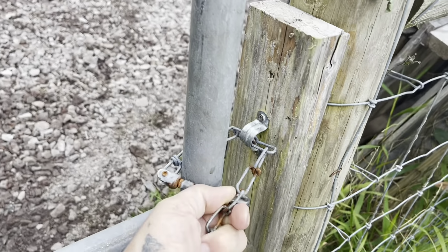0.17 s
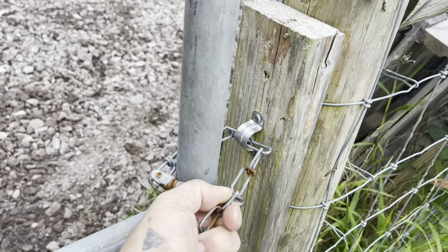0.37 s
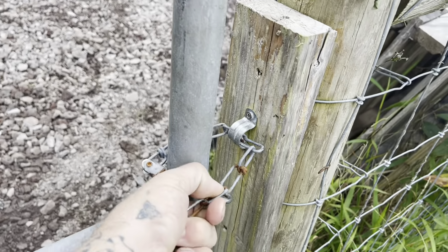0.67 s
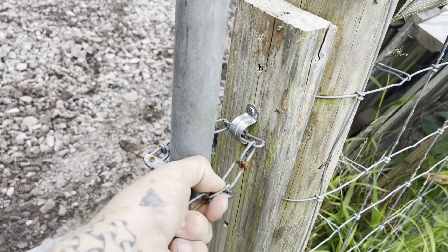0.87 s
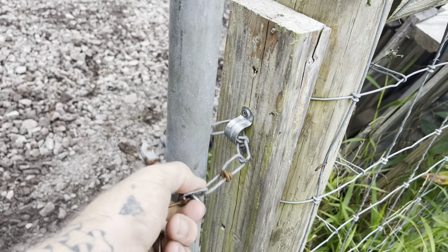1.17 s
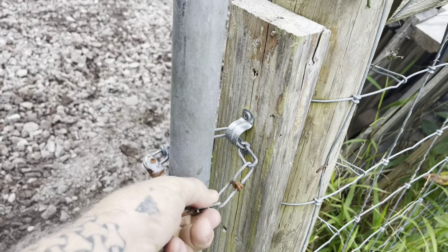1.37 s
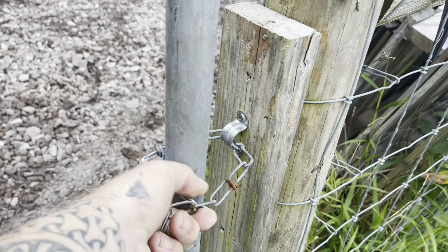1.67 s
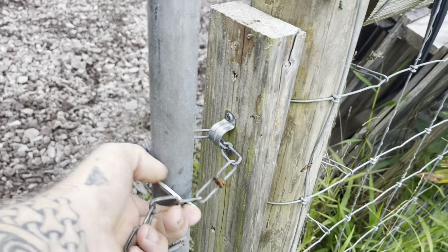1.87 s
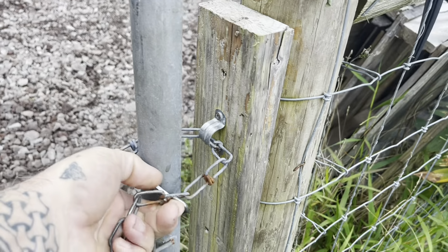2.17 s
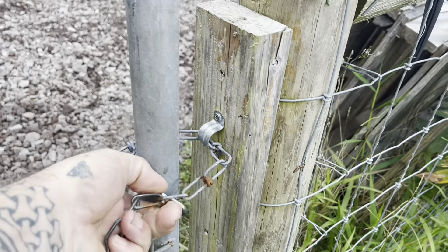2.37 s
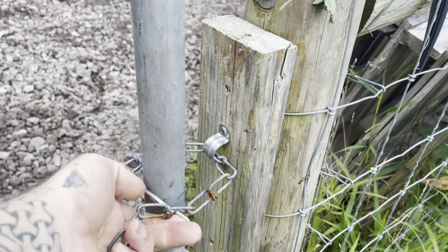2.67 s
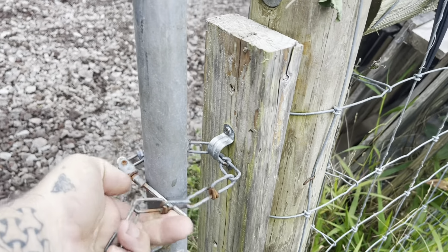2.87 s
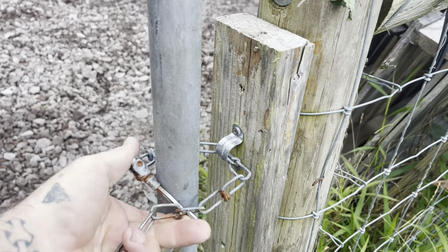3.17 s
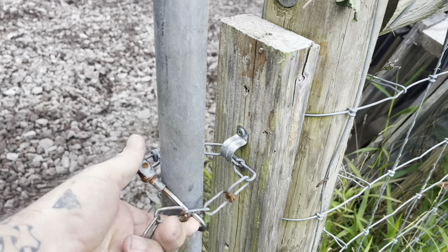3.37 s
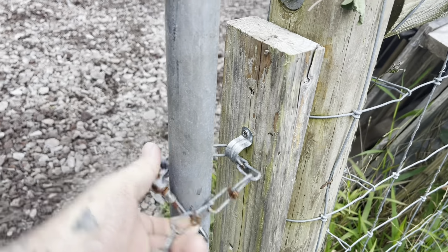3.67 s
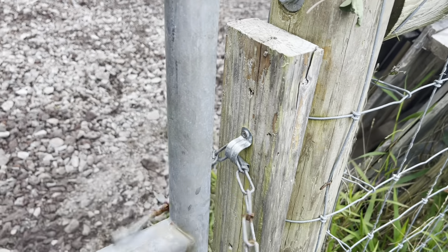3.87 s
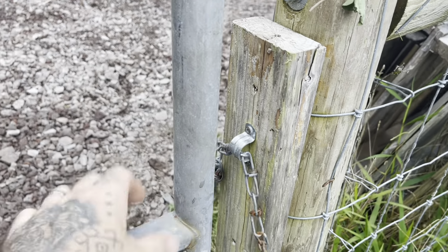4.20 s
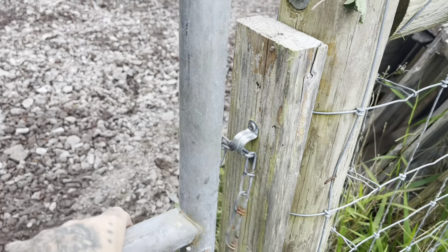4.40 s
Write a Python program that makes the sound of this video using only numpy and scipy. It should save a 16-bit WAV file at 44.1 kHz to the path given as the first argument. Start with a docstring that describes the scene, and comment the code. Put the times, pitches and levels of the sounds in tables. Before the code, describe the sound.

Chain links rub, snatch and ping as a hook is worked loose outdoors; woody knocks and a bright steel clang finish it.

```python
"""A steel-pipe farm gate outdoors, close to a two-port microphone: a hand works a snap hook and chain loose.
Links rub and clink from the start, each contact rings the gate frame, and a small bird calls far off in quiet air.
The hook's catch snaps, the freed chain knocks on the wooden post, and the hook clangs against the pipe.
Steel and wood are short noise bursts and decaying sines that excite random modes; sliding is a stream of tiny
ticks and pings, the bird a falling sine, and the air coloured noise."""
import sys
import numpy as np
from scipy import signal
from scipy.fft import rfft, irfft, next_fast_len
from scipy.io import wavfile
from scipy.ndimage import uniform_filter1d

SR = 44100
rng = np.random.default_rng(int(sys.argv[2]) if len(sys.argv) > 2 else 0)


def store_wav(level_fs):
    """Save 16-bit WAV to argv[1]."""
    pcm = np.round(np.clip(np.atleast_2d(level_fs), -1, 1) * 32767)
    wavfile.write(sys.argv[1], SR, pcm.T.astype(np.int16))


N = 200194

# steel on steel: (time [s], strength [dB], hardness [dB gained per register upwards],
# drive into the gate frame [dB], note of the thud [Hz], note of the clank [Hz])
STEEL_CONTACTS = [(0.006, -64, -2, 7.5, 310, 5590), (0.024, -62.5, -4, 5, 300, 2630),
                  (0.052, -67, -4, 3.5, 563, 1030), (0.071, -60.5, -3.5, 2, 460, 2640),
                  (0.083, -85, -3, 2, 240, 2700), (0.268, -62.5, -1, -5, 580, 2660),
                  (0.503, -63, 1, 7.5, 580, 1480), (0.528, -64, 5, 2.5, 560, 1250),
                  (0.583, -58.5, 0, 0.5, 580, 2180), (0.629, -60, -4.5, -5, 610, 2520),
                  (0.662, -58.5, 1, -0.5, 630, 3590), (0.703, -67.5, 2.5, -12, 270, 980),
                  (0.849, -56.5, -2, -1.5, 550, 6060), (0.895, -69, 2, -5, 500, 3000),
                  (0.922, -53.5, 1, 3, 560, 2540), (0.932, -47.5, -3.5, 4.5, 560, 2380),
                  (0.943, -43, 4.5, -1.5, 290, 1080), (0.951, -41, -1.5, -7.5, 520, 1080),
                  (1.013, -57, -10, -4, 298, 1990), (1.026, -53.5, -8, 3.5, 620, 3490),
                  (1.035, -44, -0.5, -7, 560, 3200), (1.04, -38.5, -2, -9.5, 565, 2970),
                  (1.083, -52.5, -5.5, -2, 520, 970), (1.106, -63, 7.5, 0.5, 270, 960),
                  (1.142, -43.5, 3.5, 6.5, 330, 1810), (1.151, -31.5, 3.5, -1.5, 580, 1845),
                  (1.171, -33, 5, -4.5, 544, 1650), (1.259, -38, 1, 3, 580, 4000),
                  (1.269, -33, 3.5, -18, 363, 4040), (1.325, -38.5, 3.5, -9.5, 565, 2300),
                  (1.352, -46.5, -1.5, -3, 460, 1520), (1.546, -55.5, -3.5, -2, 447, 1250),
                  (1.622, -65, -10, -7, 430, 1100), (1.705, -75, -5, -3, 250, 1460),
                  (1.864, -40, 0, -1.5, 529, 4950), (1.873, -44.5, 0, -3.5, 515, 2125),
                  (2.021, -60, 6, -1, 554, 1580), (2.06, -70, 9, -3.5, 450, 4000),
                  (2.107, -55.5, -6, -1.5, 460, 1010), (2.472, -56, -7.5, -2.5, 540, 1220),
                  (2.534, -64, 6.5, -1, 292, 2110), (2.707, -40.5, 2.5, 0, 580, 1320),
                  (2.792, -39, 2, -7, 294, 3190), (3.343, -53, 1, -3, 560, 6030),
                  (3.374, -67.5, -9, 18.5, 570, 1150), (3.405, -33.5, 5.5, 3.5, 554, 2220),
                  (3.415, -31, -1, -5.5, 564, 2240), (3.427, -31.5, 5, 1.5, 342, 1560),
                  (3.488, -54, 11, -12, 560, 2280), (3.624, -41.5, 6.5, -2.5, 560, 1560),
                  (3.708, -49, 3, -6.5, 500, 4770), (3.724, -52, 5, -5, 500, 4070),
                  (3.736, -39.5, 6.5, 6.5, 527, 2070), (3.745, -43.5, 7, 3, 550, 2000),
                  (3.769, -40, 3, -8, 500, 5270), (3.777, -39.5, 4.5, -0.5, 560, 5590),
                  (3.794, -36, 5.5, 4, 560, 5900), (3.815, -39, -4.5, -4.5, 320, 2080),
                  (3.823, -47.5, -13, -1, 310, 2200), (3.88, -39, 5, 8.5, 620, 1080),
                  (3.958, -48, 0.5, 7.5, 320, 4680), (4.005, -50, 5.5, -8, 270, 1670),
                  (4.031, -53, 4, -9, 270, 4650), (4.082, -45.5, 6, -13, 565, 1250),
                  (4.151, -39, 8, -11, 530, 3130), (4.178, -59, 12, -16, 580, 1940),
                  (4.246, -52, -4.5, 3.5, 560, 2600), (4.311, -27.5, 4, 7.5, 620, 4020),
                  (4.314, -30, 0.5, -14, 600, 3850), (4.346, -35.5, 6.5, 6, 630, 1520),
                  (4.46, -37, 0, 0.5, 555, 1790), (4.527, -42, 7.5, 12.5, 580, 1670)]
# thud, clank, clink and tick registers: (low edge [Hz], high edge [Hz])
CONTACT_REGISTERS = [(120, 750), (750, 2700), (2700, 6500), (6500, 13000)]
# how each register dies: (contact t60 [s], chain shiver [dB], frame ring [dB])
REGISTER_DECAYS = [(0.075, -4.5, 2), (0.031, 1, 1.5), (0.019, -6, -1.5), (0.0098, -4, -5.5)]
# colour of a contact within its registers: (frequency [Hz], level [dB])
STEEL_COLOUR = [(120, -4), (190, -12), (290, 2), (400, -5), (570, -0.5), (800, -3.5), (1200, 1.5),
                (3100, -0.5), (4000, 0), (5500, 2), (7000, -2), (8200, 7), (9500, 9.5), (13000, 0.5)]
# hook and links: (frequency [Hz], level [dB], t60 [s])
HOOK_MODES = [(3750, -29.5, 0.18), (4167, -29, .3), (4400, -29.5, 0.35), (5260, -17, 0.45),
              (5160, -27.5, .35), (6320, -6.5, 0.41), (7430, -22, .4), (8100, -19.5, 0.28),
              (8700, -22, 0.3), (7800, -18, 0.22), (8300, -16, 0.18), (8500, -31, .2), (8530, -27, 0.16),
              (9400, -22.5, 0.26)]
# the hook's bow while it is latched: (frequency [Hz], level [dB], t60 [s])
HELD_BOW_MODES = [(4000, -22.5, 0.87), (7940, -11.5, 0.13), (7840, -12, 0.26), (11100, -12.5, 0.11)]
# the hook's bow once it hangs free: (frequency [Hz], level [dB], t60 [s])
FREE_BOW_MODES = [(3822, -24, .4), (4005, -25, .3), (4237, -24, 0.6), (4689, -16, 0.35), (4737, -22, .25),
                  (4915, -24, .5), (5370, -24, .36), (6266, -24, 0.45), (6907, -22, 0.5), (7079, -22, 0.35),
                  (7820, -22, 0.35), (8457, -20, 0.22), (8720, -21, .25), (11400, -22, .12)]
# strongest modes of the gate pipe: (frequency [Hz], level [dB], t60 [s])
PIPE_MODES = [(541, -13.5, 0.75), (580, -17, 1.5), (650, -15, 0.62), (815, -17, 1.3), (917, -16, 1.9),
              (1003, -7.5, 2.1), (1080, -8, 3.9), (1089, -9, 2), (1240, -17.5, 1.4), (1488, -10.5, 3),
              (1538, -14.5, 1.8), (1660, -15.5, 3.1), (1700, -14, 1.6), (2035, -16, 1.5), (2115, -12, 2.1),
              (2260, -10.5, 1.7), (2420, -16.5, 1.4), (3060, -16, 0.72), (3680, -16, 2), (4021, -21.5, 1.1)]
# colour of a crowd of weaker modes: (frequency [Hz], level [dB])
CROWD_COLOUR = [(120, 6), (200, -11.5), (300, -5.5), (400, -7), (560, -1), (820, -2), (1100, 1), (1500, -1),
                (1850, -1), (2250, 1.5), (2700, -3), (3300, -7.5), (3800, 2), (4800, -0.5), (5400, -2),
                (8100, 3), (12500, -4)]
# how the frame's weaker modes die: (frequency [Hz], t60 [s])
FRAME_DECAY = [(150, 3.5), (500, 1.17), (1200, 2.43), (2400, 1.17), (4000, 1.02), (8500, 0.49),
               (12000, 0.36)]
# two links snatch tight with a very short, bright crack: (time [s], level [dB], frequency [Hz])
LINK_CRACKS = [(1.1516, -28, 7900), (1.2694, -31, 8000), (2.7073, -29, 8370), (3.403, -30, 5950),
               (3.406, -26, 8600), (3.4265, -21.5, 8300), (3.431, -30, 8100), (3.794, -25, 6800),
               (3.8808, -32, 11500), (4.346, -25.5, 9000), (4.527, -27.5, 8600)]
# notes of the hook's sprung catch: (frequency [Hz], level [dB], t60 [s])
CATCH_MODES = [(3000, 0.5, 0.067), (3150, 3, 0.041), (3600, 1, 0.092), (3671, -9, 1.4), (3570, -9.5, 0.84),
               (4430, -22, .8)]
# a link lands on the post: (time [s], level [dB], favoured note [Hz], crunch t60 [s], crunch [dB])
POST_KNOCKS = [(0.004, -51, 396, 0.035, -5), (0.031, -57, 300, .03, -13), (1.546, -40.5, 1150, 0.034, -4),
               (1.55, -39.5, 386, 0.051, -8.5), (2.798, -44.5, 380, 0.04, -5),
               (4.08, -25.5, 2080, 0.017, 6), (4.084, -32.5, 1110, 0.033, 3),
               (4.0877, -22, 1260, 0.0081, -5.5), (4.095, -29.5, 560, 0.037, -4),
               (4.117, -39.5, 2670, 0.015, -2), (4.121, -35, 450, 0.021, -5),
               (4.1479, -22.5, 3000, 0.017, -14), (4.149, -19, 2650, 0.019, -3),
               (4.151, -32.5, 600, 0.017, -1), (4.156, -33, 1390, 0.036, 12), (4.181, -48, 1900, 0.034, 10)]
# the wooden post with its staple: (frequency [Hz], level [dB], t60 [s])
POST_MODES = [(337, -3.5, 0.08), (460, -4, 0.1), (580, -0.5, 0.086), (786, -18, 0.044), (1243, 5.5, 0.053),
              (1564, 2.5, 0.04), (1900, -8, 0.047), (2290, 0, 0.028), (2994, 5.5, 0.016), (3500, -5, 0.017),
              (6300, -0.5, 0.0058), (9000, 12, 0.001)]
# the hook's shank, ahead of its band-pass: (frequency [Hz], level [dB], t60 [s])
SHANK_MODES = [(3780, -3.5, 0.071), (3810, -2.5, 0.02), (4340, -14, 0.041), (4800, -8, 0.087)]
# moves of the hand: (start [s], hold [s], links sliding [dB], gate stirring [dB])
HAND_MOVES = [(0.0, 0.031, -57, -53), (0.15, 0.033, -78, -65), (0.28, 0.094, -74.5, -75.5),
              (0.492, 0.14, -64.5, -62), (0.875, 0.05, -63.5, -68), (0.995, 0.19, -67, -49),
              (1.304, 0.03, -61, -45), (1.61, 0.044, -66.5, -58), (1.667, 0.15, -70.5, -69),
              (2.039, 0.125, -61, -61.5), (2.525, 0.42, -63.5, -60), (2.808, 0.14, -59.5, -54.5),
              (3.213, 0.08, -68.5, -76.5), (3.4, 0.31, -61, -50), (3.607, 0.11, -60, -47),
              (3.742, 0.063, -37, -46), (3.807, 0.04, -43.5, -46), (3.979, 0.06, -54, -44),
              (4.136, 0.04, -49.5, -41), (4.41, 0.11, -37.5, -51.5)]
# falling whistles of the bird: (time [s], peak level of the direct sound [dB])
BIRD_NOTES = [(0.126, -69), (.274, -67), (0.424, -68.5)]
# colour of the outdoor rush: (frequency [Hz], relative level [dB per Hz])
AIR_COLOUR = [(20, -35.5), (40, -16.5), (60, 1.5), (110, -4), (170, -0.5), (300, -8.5), (600, -10.5),
              (1200, -17), (2200, -23.5), (3200, -24.5), (5300, -20.5), (7000, -35), (11000, -37),
              (14000, -61)]
# the two microphone ports: (frequency [Hz], left minus right [dB])
PORT_LEVELS = [(100, 3), (330, -1.5), (650, 5.5), (1200, 3), (4400, 2.5), (8000, 1.4), (13000, -1)]
# the two microphone ports: (frequency [Hz], lead of the left [radians])
PORT_LEADS = [(300, 0.22), (900, 1), (1200, 0.8), (1700, -1.0), (2000, 0.4), (2500, 0.81), (3300, 1.28),
              (4000, 0.6), (4700, 0.6), (6500, 0.83), (7500, 1.02), (8400, 0.07), (9000, -1.57),
              (10200, -2.5), (11500, -5.4), (13000, -8.5)]

TIME = np.arange(N) / SR
RING = 2 * SR   # samples in the longest ring
AGE = np.arange(RING) / SR   # seconds since a blow

# a taut chain tugs the gate with a thud; once the hook is free the chain hangs slack and thuds less
HOOK_FREE_S = 3.42
TAUT_THUD_DB, SLACK_THUD_DB = -2, -13
THUD_LOSS = 0.29   # dB of thud lost per dB that goes into the frame's ring
LINK_LOW_HZ, LINK_HIGH_HZ = 3970, 12750   # range of the links' own notes
SNAP_S, SNAP_DB = 2.7925, -38.5   # the hook's catch snaps shut
CLANG_S, CLANG_DB = 4.3108, -15.5   # the swinging hook meets the pipe squarely
MOVE_RISE_DB_PER_S, MOVE_FALL_DB_PER_S = 343.5, 143
RESTING_RUB_DB, RESTING_STIR_DB = -80.5, -72.5   # the hand only holds the chain
FIRM_PULL_DB = -50   # links slide at this level and above before they ping clearly
REBOUND_S = 0.0065   # longest wait before a caught part rebounds
AIR_DB = -66.5
CUTOFF_HZ = 16500   # last low-pass of the microphone


def contacts(shiver_t60=0.15, hook_db=-10, pipe_db=-13, chatter=0.23, build_up=0.0026,
             thud_note_db=9, clank_note_db=12):
    """Each contact is a burst of tiny impacts; it shakes the chain briefly and the gate frame for long."""
    direct, shiver, frame, drive = np.zeros((4, N))
    size = SR // 8
    for k, (low, high) in enumerate(CONTACT_REGISTERS):
        t60, shiver_db, frame_db = REGISTER_DECAYS[k]
        passed = np.zeros(N)
        grit = band(noise(STEEL_COLOUR), low, high, order=4)
        unevenness = rms_one(uniform_filter1d(rng.standard_normal(RING), size=4 * SR // high))
        grit = grit * np.exp(chatter * unevenness)
        # lows take longer to build up
        envelope = fade(t60, size) * (1 - np.exp(-AGE[:size] / (build_up + 2 / high)))
        starts = rng.integers(size, RING - size, len(STEEL_CONTACTS))
        for contact, start in zip(STEEL_CONTACTS, starts):
            s, strength_db, hardness_db, drive_db, thud_hz, clank_hz = contact
            touch = grit[start:start + size] * envelope
            if k == 0:
                struck = favour(touch, thud_hz, thud_note_db, cycles=18)
            else:
                struck = favour(touch, clank_hz, clank_note_db, cycles=13)
            level_db = register_db(k, s, strength_db, hardness_db, drive_db)
            add(direct, s, blow(struck, level_db))   # the struck part sounds its own note
            add(passed, s, blow(touch, level_db + drive_db))   # the frame gets the plain blow
        shiver += from_db(shiver_db) * passed
        frame += from_db(frame_db) * passed
        drive += passed
    chain = [excite(shiver, crowd(5, [(1000, shiver_t60)], size=SR // 3)) for _ in range(2)]
    centre, around = [excite(frame, crowd(6, FRAME_DECAY)) for _ in range(2)]
    # the long frame sounds wide, except in its lowest and highest notes
    around = band(around, 380, 7000, order=1)
    hook_and_pipe = from_db(hook_db) * modes(HOOK_MODES) + from_db(pipe_db) * modes(PIPE_MODES)
    tones = excite(drive, hook_and_pipe)
    free = TIME > HOOK_FREE_S
    tones += excite(drive * ~free, modes(HELD_BOW_MODES))
    tones += excite(drive * free, modes(FREE_BOW_MODES))
    return direct + tones + spread(*chain, width=0.12) + spread(centre, around, width=0.66)


def register_db(k, s, strength_db, hardness_db, drive_db):
    """Level of a contact in register k: a harder one is brighter; the thud depends on the chain's tension."""
    tension_db = TAUT_THUD_DB if s < HOOK_FREE_S else SLACK_THUD_DB
    thud_db = tension_db - THUD_LOSS * drive_db if k == 0 else 0
    middle = (len(CONTACT_REGISTERS) - 1) / 2
    return strength_db + hardness_db * (k - middle) + thud_db


def links(ring_db=-14, t60=0.077, scatter_db=3, count=3):
    """Each contact pings a different link, which sings a few short, high notes."""
    out, size = np.zeros(N), SR // 4
    draws = rng.random((len(STEEL_CONTACTS), count, 2))
    for (s, strength_db, hardness_db, *_), notes in zip(STEEL_CONTACTS, draws):
        for place, (pitch, chance) in enumerate(notes):
            hz = LINK_LOW_HZ + (LINK_HIGH_HZ - LINK_LOW_HZ) * (place + pitch) / count
            level_db = strength_db + hardness_db + ring_db + scatter_db * (2 * chance - 1)
            note = np.sin(2 * np.pi * hz * AGE[:size]) * fade(t60, size)
            add(out, s, blow(note, level_db))
    return out


def cracks(t60=0.021, width=0.15, build_up=0.00039):
    """The struck link's stiff note, a narrow noise burst, is choked at once by its neighbour's grip."""
    out, size = np.zeros(N), SR // 30
    envelope = fade(t60, size) * (1 - np.exp(-AGE[:size] / build_up))
    for s, level_db, hz in LINK_CRACKS:
        low, high = hz * (1 - 2 * width), hz * (1 + 2 * width)
        colour = [(hz / 8, -30), (low, -12), (hz, 0), (high, -14), (2 * hz, -30)]
        add(out, s, blow(noise(colour, size) * envelope, level_db))
    return out


def knocks(ring_db=-15, favour_db=9, reach=2.6, body_db=-11):
    """Steel on wood: each link lands with a crunch around its own note and the post's damped modes."""
    out, size = np.zeros(N), SR // 8
    for s, level_db, favoured_hz, crunch_t60, crunch_db in POST_KNOCKS:
        # modes lose level with each octave away from the favoured note
        leaning = [(hz, db - favour_db * abs(np.log2(hz / favoured_hz)), t60) for hz, db, t60 in POST_MODES]
        wood = unit_energy(modes(leaning))[:size]
        colour = [(60, -22), (favoured_hz / 4, body_db), (favoured_hz / 2, -1), (0.96 * favoured_hz, 0),
                  (2 * favoured_hz, -13), (9000, -21), (15000, -34)]
        crunch = unit_energy(noise(colour, size) * fade(crunch_t60, size))
        # a duller blow is a softer contact
        soften = signal.butter(1, min(reach * favoured_hz, .45 * SR), fs=SR)
        landing = signal.lfilter(*soften, wood + from_db(crunch_db) * crunch)
        add(out, s, blow(landing, level_db))
    out = band(out, 178, 20000, order=2)   # a narrow post radiates little bass
    fence_decay = [(200, 0.54), (6000, 0.18)]
    fence = [excite(out, crowd(39.0, fence_decay, size=SR // 2)) for _ in range(2)]
    return out + from_db(ring_db) * spread(*fence, width=1.0)


def snap():
    """The catch springs shut with a short clack and leaves the hook singing faintly."""
    out = np.zeros(N)
    add(out, SNAP_S, blow(modes(CATCH_MODES), SNAP_DB))
    return out


def clang():
    """The hook's shank rings briefly when it hits the pipe."""
    out = np.zeros(N)
    add(out, CLANG_S, blow(band(modes(SHANK_MODES), 3900, 5400, order=2), CLANG_DB))
    return out


def rubbing(hiss_db=-1, ping_db=-5, shuffle_db=-3, clunk_db=-5.0):
    """Sliding links tick, and ping when pulled firmly; the gate shifting in the hand clunks softly and low."""
    tick_colour = [(500, -23.0), (2000, 1), (4000, -0.5), (7000, -3.0), (8300, -2.0), (9500, 8.5),
                   (11500, -0.5), (13500, -34.5)]
    ticks = slips(270, 2.0, tick_colour, t60=0.037)
    pings = catches(per_s=210, size_db=5.5, low_hz=1900, high_hz=9860, cycles=150)
    shuffle_colour = [(60, -3), (200, -11.5), (300, -1.5), (400, -9.5), (580, 2), (800, -7), (1150, 0.5),
                      (1600, -8.5), (2500, -9.5), (6000, -45.5)]
    shuffle = slips(65, 3.2, shuffle_colour, t60=0.097)
    clunks = catches(per_s=75, size_db=2, low_hz=250, high_hz=998, cycles=24)
    sliding, stirring = handling()
    firmness = np.sqrt(np.minimum(sliding / from_db(FIRM_PULL_DB), 1))
    chain = sliding * (from_db(hiss_db) * ticks + firmness * from_db(ping_db) * pings)
    gate = stirring * (from_db(shuffle_db) * shuffle + from_db(clunk_db) * clunks)
    return chain + gate


def handling():
    """Gains of sliding and stirring: each move of the hand swells quickly, holds and dies away."""
    rub_db, stir_db = RESTING_RUB_DB, RESTING_STIR_DB
    for s, hold, slide_db, shift_db in HAND_MOVES:
        rise_db = np.minimum(MOVE_RISE_DB_PER_S * (TIME - s), 0)
        fall_db = np.maximum(MOVE_FALL_DB_PER_S * (TIME - s - hold), 0)
        rub_db = np.maximum(rub_db, slide_db + rise_db - fall_db)
        stir_db = np.maximum(stir_db, shift_db + rise_db - fall_db)
    return from_db(rub_db), from_db(stir_db)


def slips(per_s, size_db, colour, t60, build_up=0.00021):
    """Random small catches of uneven size, each with a slightly different ring; rms 1."""
    out, size = np.zeros(N), SR // 16
    grit = noise(colour)
    envelope = fade(t60, size) * (1 - np.exp(-AGE[:size] / build_up))
    for when, which, strength in rng.random((int(per_s * N / SR), 3)):
        start = int(which * (RING - size))
        gain = from_db(size_db * min(-np.log(strength), 3))
        add(out, when * TIME[-1], gain * grit[start:start + size] * envelope)
    return rms_one(out)


def catches(per_s, size_db, low_hz, high_hz, cycles, rebound_share=0.56):
    """Loose parts catch and ring, each at its own pitch, and every catch rebounds once; rms 1."""
    out, size = np.zeros(N), SR // 8
    for when, pitch, strength, rebound in rng.random((int(per_s * N / SR), 4)):
        hz = low_hz * (high_hz / low_hz) ** pitch
        note = np.sin(2 * np.pi * hz * AGE[:size]) * fade(cycles / hz, size)
        ping = blow(note, size_db * min(-np.log(strength), 3))
        s = when * (TIME[-1] - REBOUND_S)
        add(out, s, ping)
        add(out, s + rebound * REBOUND_S, rebound_share * ping)
    return rms_one(out)


def bird(start_hz=4900, end_hz=4150, length=0.05, bend=1.63, waver_hz=45, echo_db=-4, echo_t60=0.4):
    """Each note is a short, wavering whistle that falls and levels out; the yard scatters it."""
    out, u = np.zeros(N), np.linspace(0, 1, int(length * SR))
    for s, level_db in BIRD_NOTES:
        waver = waver_hz * noise([(150, 4), (600, -37)])[:len(u)]
        hz = end_hz + (start_hz - end_hz) * (1 - u) ** bend + waver
        whistle = np.sin(2 * np.pi * np.cumsum(hz) / SR) * np.sin(np.pi * u)
        add(out, s, from_db(level_db) * whistle)
    yard = unit_energy(rng.standard_normal(RING) * fade(echo_t60))
    return out + from_db(echo_db) * excite(out, yard)


def air(hum_hz=111, hum_db=-64.5, wind_db=-66, gust_db=3):
    """Soft outdoor rush, faint puffs of wind, and a distant drone that swells, fades and returns."""
    rush = from_db(AIR_DB) * spread(noise(AIR_COLOUR, N), noise(AIR_COLOUR, N), width=0.4)
    gusts = from_db(gust_db * noise([(2, -8.0), (5, -8.5), (20, -72.5), (200, -120)], N))
    rumble = noise([(18, -59.5), (35, -17), (58, 0.5), (110, 0.0), (400, -51.0), (4000, -100)], N)
    wind = from_db(wind_db) * rms_one(gusts * rumble)
    drone = rms_one(band(rng.standard_normal(N), hum_hz - 4, hum_hz + 4, order=2))
    drift_db = np.interp(TIME, [0, 1.0, 2.2, 4.5], [-4.5, 5.5, -14.5, 1.0])
    return rush + wind + from_db(hum_db + drift_db) * drone


def from_db(db):
    """Decibels to gain."""
    return 10 ** (np.asarray(db) / 20)


def unit_energy(x):
    """Scales to a sum of squares of 1."""
    return x / np.sqrt(np.sum(x ** 2) + 1e-20)


def rms_one(x):
    """Scales to rms 1."""
    return x / np.sqrt(np.mean(x ** 2) + 1e-20)


def at_hz(points, hz):
    """Reads a table on a log-frequency axis."""
    table = np.array(points)
    return np.interp(np.log(np.maximum(hz, 1)), np.log(table[:, 0]), table[:, 1])


def band(x, low_hz, high_hz, order=3):
    """Causal band-pass."""
    edges = [low_hz, min(high_hz, .45 * SR)]
    return signal.sosfilt(signal.butter(order, edges, "band", fs=SR, output="sos"), x)


def favour(x, hz, lift_db, cycles):
    """Lifts one resonance of a sound; it rings on for a few cycles."""
    return x + (from_db(lift_db) - 1) * signal.lfilter(*signal.iirpeak(hz, max(cycles, 2), fs=SR), x)


def fade(t60, size=RING):
    """Exponential decay, 60 dB down after t60, that stops falling at 120 dB down."""
    return np.exp(-np.log(1000) * np.minimum(AGE[:size] / t60, 2))


def noise(spectrum, size=RING):
    """Noise of a given colour, rms 1."""
    n = next_fast_len(size, real=True)
    gain = from_db(at_hz(spectrum, np.fft.rfftfreq(n, 1 / SR)))
    return rms_one(irfft(rfft(rng.standard_normal(n)) * gain, n)[:size])


def excite(force, response):
    """What a body with this response makes of the force."""
    return signal.fftconvolve(force, response)[:N]


def add(track, s, sound):
    """Mixes a sound in at time s."""
    start = max(round(s * SR), 0)
    track[start:start + len(sound)] += sound[:N - start]


def blow(shape, level_db):
    """Scales a short sound to a level reckoned over a hundredth of a second."""
    return from_db(level_db) * unit_energy(shape) * np.sqrt(SR / 100)


def modes(table):
    """Response of decaying sines, each with the energy that its dB gives."""
    out = np.zeros(RING)
    for hz, db, t60 in table:
        size = min(int(t60 * SR) + 1, RING)
        note = np.sin(2 * np.pi * hz * AGE[:size]) * fade(t60, size)
        out[:size] += from_db(db) * unit_energy(note)
    return out


def crowd(spacing_hz, t60s, size=RING, sparse_above_hz=7000):
    """Response of many modes at random pitches, sparser in the treble; each band dies at its own rate."""
    hz, out = np.fft.rfftfreq(size, 1 / SR), 0
    chance = hz[1] / (spacing_hz * (1 + (hz / sparse_above_hz) ** 2))
    lines = (rng.random(len(hz)) < chance) * np.exp(2j * np.pi * rng.random(len(hz)))
    edges = [110, 350, 700, 1000, 1400, 1800, 2200, 2700, 3400, 4400, 6000, 8000, 10500, 16000]
    for low, high in zip(edges, edges[1:]):
        t60 = at_hz(t60s, np.sqrt(low * high))
        ringing = irfft(lines * (hz >= low) * (hz < high), size) * fade(t60, size)
        out = out + unit_energy(ringing) * np.sqrt(2 * (high - low) / SR)   # gain about 1 ahead of the colour
    coloured = irfft(rfft(out) * from_db(at_hz(CROWD_COLOUR, hz)), size)
    return coloured * np.minimum(np.linspace(10, 0, size), 1) ** 2   # the last tenth runs out to silence


def spread(mid, side, width):
    """Stereo pair of unchanged power."""
    return (mid + width * side * np.array([[1], [-1]])) / np.sqrt(1 + width ** 2)


def scene():
    """The latch lies a little to the left; the two ports hear it with different level and phase."""
    n = next_fast_len(N + SR // 10, real=True)
    hz = np.fft.rfftfreq(n, 1 / SR)
    gate = contacts() + links() + cracks() + knocks() + snap() + clang() + rubbing()
    left, right = rfft(gate, n)
    # each port takes half of the difference
    ports = from_db(at_hz(PORT_LEVELS, hz) / 2) * np.exp(.5j * at_hz(PORT_LEADS, hz))
    return irfft(np.array([left * ports, right / ports]), n)[:, :N] + bird() + air()


def record(dry, top_hz=12300, leak_db=-13):
    """The microphone ports pass little of the highest treble; the top is cut."""
    edge_hz = min(top_hz, .45 * SR)
    passed = signal.sosfilt(signal.butter(10, edge_hz, fs=SR, output="sos"), dry)
    highest = signal.sosfilt(signal.butter(10, edge_hz, "high", fs=SR, output="sos"), dry)
    top_cut = signal.ellip(10, .1, 80, CUTOFF_HZ, fs=SR, output="sos")
    return signal.sosfilt(top_cut, passed - from_db(leak_db) * highest)


dry = scene()
out = record(dry)
store_wav(out)
```